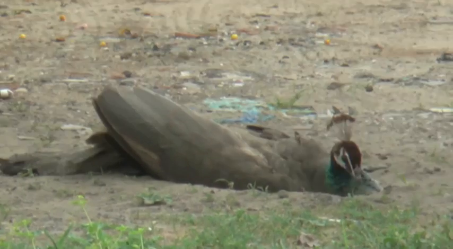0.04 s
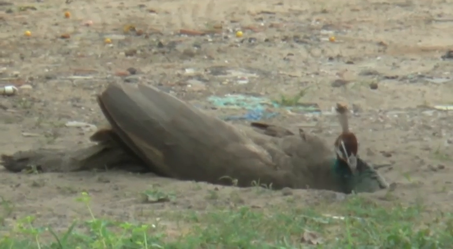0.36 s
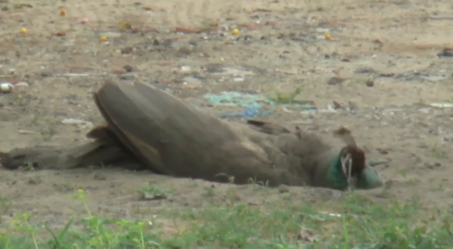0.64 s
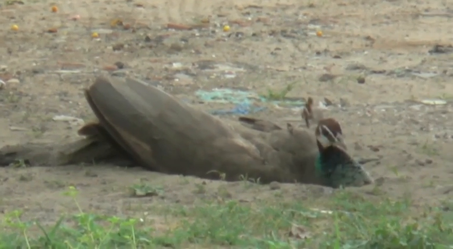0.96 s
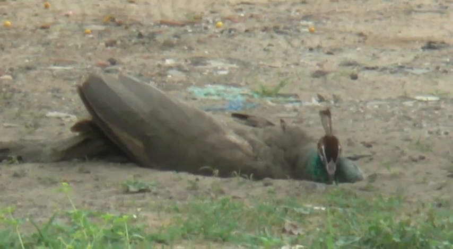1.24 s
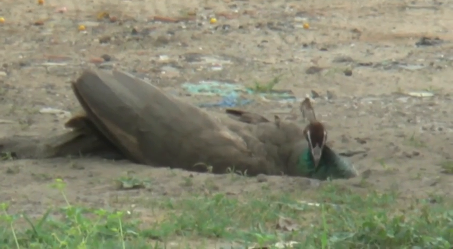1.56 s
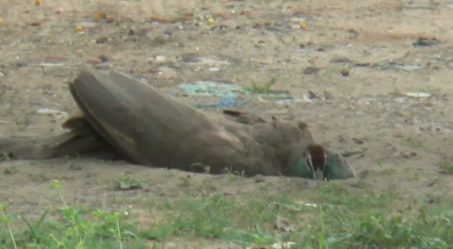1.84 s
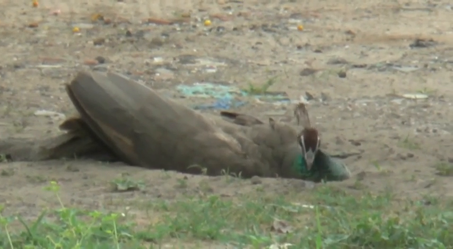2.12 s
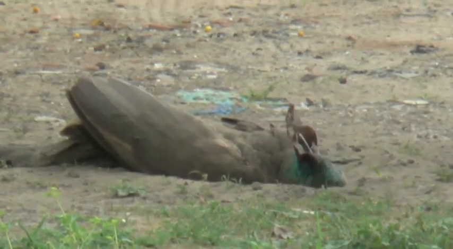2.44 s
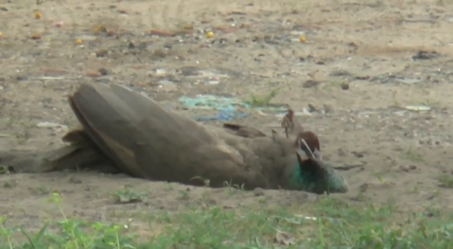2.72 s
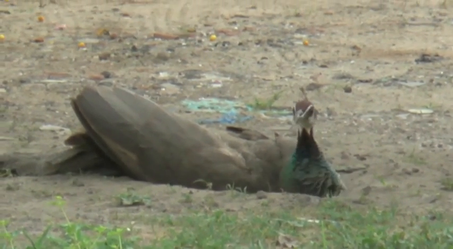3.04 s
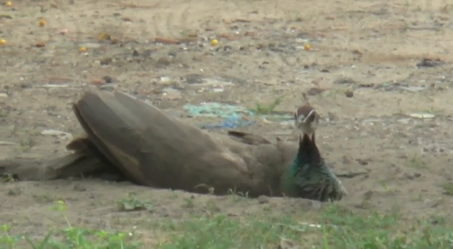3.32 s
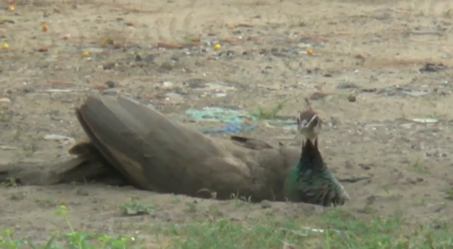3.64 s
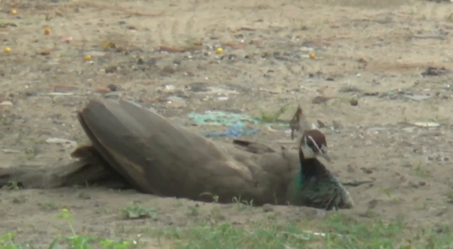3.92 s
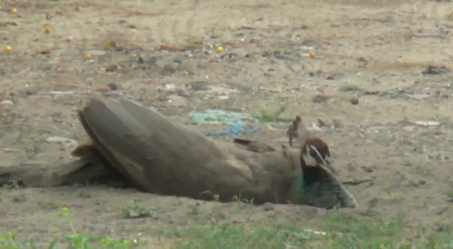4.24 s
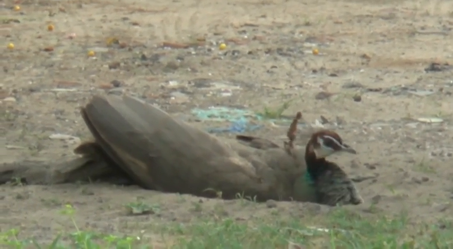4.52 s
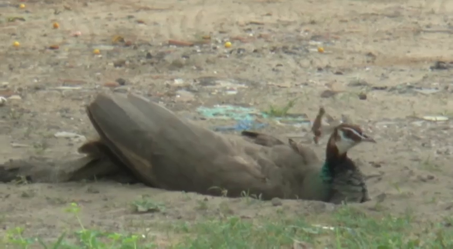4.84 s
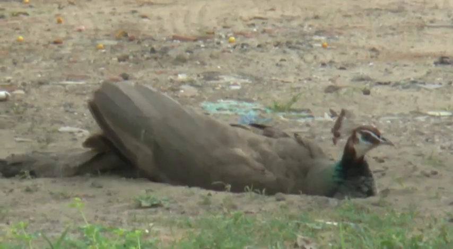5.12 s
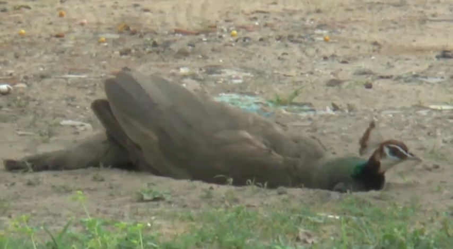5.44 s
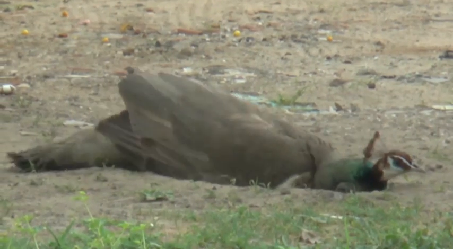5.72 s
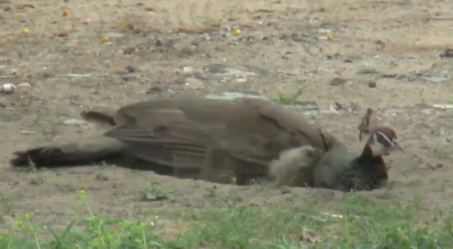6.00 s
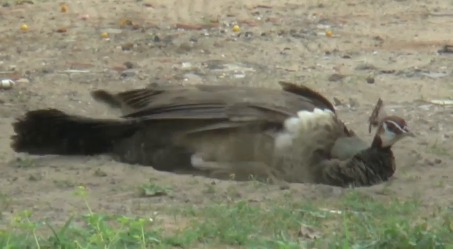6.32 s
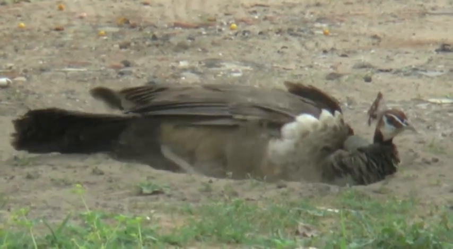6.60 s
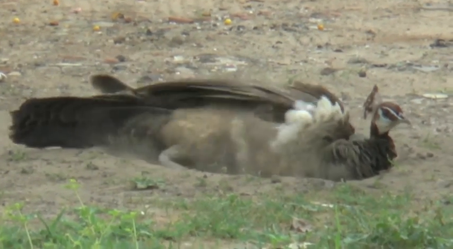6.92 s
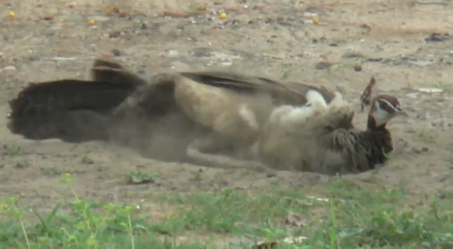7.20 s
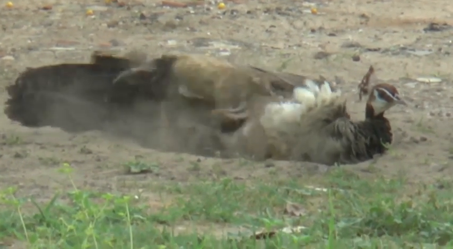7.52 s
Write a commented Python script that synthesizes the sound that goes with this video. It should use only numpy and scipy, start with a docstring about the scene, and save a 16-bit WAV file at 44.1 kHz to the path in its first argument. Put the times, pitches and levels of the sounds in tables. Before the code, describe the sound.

In an open yard, a nearby bird squeaks and rasps up to one clear arched whistle, crossed at first by harsh chatter. Insects buzz and trill in swells over a low rumble and leafy hiss, while distant birds twitter. Then a peahen dust-bathes close to the microphone with dry clicks, soft bumps and gritty swishes. The chatter returns in quick runs, and a faint hoot sounds near the end.

```python
"""A yard opens on a low rumble, a leafy hiss and a swell of buzzing insects. A near bird squeaks and
rasps up to one arched whistle, crossed at first by harsh chatter. An insect's trill swells and far birds
twitter and whistle. From about 3 s come dry clicks, soft bumps and the swishes of a peahen dust-bathing;
the chatter returns in quick runs, the insects swell again, and a far hoot sounds near the end.
A close wall colours most of the sounds, and the yard gives birds, knocks and swishes a short echo."""
import sys
import numpy as np
from scipy import signal
from scipy.fft import rfft, irfft, next_fast_len
from scipy.io import wavfile
from scipy.ndimage import uniform_filter1d, map_coordinates

SR = 44100
rng = np.random.default_rng(int(sys.argv[2]) if len(sys.argv) > 2 else 0)


def int16_out(signal):
    """Quantize to a 16-bit WAV file."""
    q = np.round(np.clip(np.atleast_2d(signal).T, -1, 1) * 32767)
    wavfile.write(sys.argv[1], SR, q.astype(np.int16))


N = 337806
TOP_HZ = 15800


def amp(db):
    """Decibels to gain."""
    return 10 ** (np.asarray(db) / 20)


def unit(x):
    """Scale to rms 1."""
    return x / np.sqrt(np.mean(x ** 2) + 1e-20)


def along(points, hz):
    """Read (f/Hz, value) points on a log frequency axis."""
    f, v = np.transpose(points)
    return np.interp(np.log(hz + 1), np.log(f), v)


def curves(rows, t):
    """Automation lanes: each column after the time, read at times t."""
    s, *cols = np.transpose(rows)
    return [np.interp(t, s, c) for c in cols]


def wobble(rate, size):
    """A smooth random modulator, rate knots a second."""
    knots = rng.standard_normal(16384)
    return map_coordinates(knots, [np.arange(size) * rate / SR], mode="wrap")


def filtered(x, response):
    """Apply a frequency response to x."""
    m = next_fast_len(N + 8192)
    return irfft(rfft(x, m) * response(np.fft.rfftfreq(m, 1 / SR)), m)[..., :N]


def coloured(x, eq):
    """x through an EQ curve, at rms 1."""
    return unit(filtered(x, lambda hz: amp(along(eq, hz))))


def add(track, s, sound):
    """Mix a sound into a track at time s."""
    part = track[max(0, round(s * SR)):][:len(sound)]
    part += sound[:len(part)]


def fade(t, edge):
    """Smooth fade in and out, edge seconds each."""
    return np.sin(np.pi / 2 * np.clip(np.minimum(t - t[0], t[-1] - t) / edge, 0, 1)) ** 2


def swell(start, hold, rise, t60):
    """An envelope that climbs 60 dB in rise seconds up to start, holds, then dies away."""
    t = np.arange(N) / SR
    return amp(-60 * (np.maximum(start - t, 0) / rise + np.maximum(t - start - hold, 0) / t60))


# Stereo image of the noise beds: f/Hz, left-right correlation
CORRELATION = [(30, 0.22), (80, 0.98), (160, 0.93), (3000, 0.99), (12000, 0.98)]
def rush(eq, patchy_db=0.9):
    """Stereo noise of rms 1 with drifting patches of gain."""
    def mid_side(hz):
        width = np.arccos(np.clip(along(CORRELATION, hz), -1, 1)) / 2
        return amp(along(eq, hz)) * np.array([np.cos(width), np.sin(width)])
    spectra = signal.stft(rng.standard_normal((2, N)), nperseg=512)[2]
    patches = uniform_filter1d(rng.standard_normal(spectra.shape[1:]), size=5, axis=0)
    patches = uniform_filter1d(patches, size=14, axis=1)
    pair = signal.istft(spectra * amp(patchy_db * unit(patches)), nperseg=512)[1][:, :N]
    mid, side = filtered(pair, mid_side)
    return unit(np.array([mid + side, mid - side]))


# Rumble EQ: f/Hz, level/dB
RUMBLE_EQ = [(15, -52), (25, -17), (195, 2), (328, -4.5), (482, -20), (573, -13), (870, -16.5),
             (1090, -23.5), (1250, -19.5), (1420, -17), (1600, -32), (2080, -25), (3520, -120)]
# Rumble fader, before trim: t/s, level/dB
RUMBLE_FADER = [(0.0, -56.5), (1.28, -57), (7.66, -60)]
def rumble(trim_db=2):
    """A bed of distant rumble that slowly eases off."""
    db = curves(RUMBLE_FADER, np.arange(N) / SR)[0]
    return amp(db + trim_db) * rush(RUMBLE_EQ, patchy_db=1.66)


# Leaf hiss EQ: f/Hz, level/dB
FOLIAGE_EQ = [(760, -42), (1300, -76), (1590, -4.5), (2100, -1.5), (3440, 1.5), (3740, 2), (4020, -2.5),
              (5440, -8), (7760, -25), (9180, -17.5), (15800, -27)]
# Leaf hiss fader, before trim: t/s, level/dB
FOLIAGE_FADER = [(0.0, -60.5), (0.72, -68), (1.36, -61.5), (2.22, -63), (4.18, -62), (4.44, -63),
                 (5.52, -66.5), (6.01, -66.5), (6.55, -65), (6.76, -60), (7.04, -66), (7.66, -66)]
def foliage(trim_db=8):
    """The hiss of leaves, rising and falling."""
    db = curves(FOLIAGE_FADER, np.arange(N) / SR)[0]
    return amp(db + trim_db) * rush(FOLIAGE_EQ)


# EQ of the buzz's body: f/Hz, level/dB
BODY_EQ = [(2600, -83), (3100, 2.5), (3700, 4), (4200, 4), (4600, -5.5), (7000, -66)]
# EQ of its sizzle: f/Hz, level/dB
SIZZLE_EQ = [(6500, 2), (8500, -4), (9200, 13.5), (10500, -5.5), (13800, -7), (14800, 6), (15700, -11.5)]
# Insect swells: t/s, hold/s, level/dB
BUZZ_CUES = [(0.233, 0.45, -52.5), (4.863, 0.4, -52)]
def buzz(lead_s=0.1, sizzle_db=-9.5):
    """Insects buzz in swells; a high sizzle joins at the height of each and dies sooner."""
    body = sum(amp(db) * swell(s - lead_s, hold + lead_s, rise=1.0, t60=2.9)
               for s, hold, db in BUZZ_CUES)
    sizzle = sum(amp(db + sizzle_db) * swell(s, hold, rise=0.37, t60=0.92) for s, hold, db in BUZZ_CUES)
    return body * rush(BODY_EQ) + sizzle * rush(SIZZLE_EQ)


def slur(length, hz, glide, arch):
    """Times and pitches of a note gliding through hz; a positive arch bows it upward."""
    t = np.arange(0, length, 1 / SR)
    progress = t / length - .5
    return t, hz * (1 + glide * progress - arch * progress ** 2)


# EQ on a whistle's overtones, relative to the fundamental: f/Hz, level/dB
OVERTONE_EQ = [(4000, -44), (4700, -31), (5800, -44), (7200, -40), (8300, -32), (9400, -22), (10200, -42),
               (11700, -36), (13500, -51)]
def whistle(hz, rough, rasp_hz=260, swing_hz=270, scatter_hz=130, flutter_db=4.5):
    """A syrinx tone; a second, uneven oscillation shakes its pitch and strength into a rasp."""
    n = len(hz)
    rasp = np.sin(2 * np.pi * np.cumsum(rasp_hz * (1 + 0.276 * wobble(150.3, n))) / SR)
    pitch = hz + rough * (swing_hz * rasp + scatter_hz * wobble(412.8, n))
    phase = 2 * np.pi * np.cumsum(pitch) / SR
    overtones = sum(amp(along(OVERTONE_EQ, k * hz)) * np.sin(k * phase) * (k * hz < TOP_HZ)
                    for k in range(2, 6))
    flutter = amp(rough * flutter_db * (rasp + wobble(311, n)))
    return unit((np.sin(phase) + overtones) * flutter)


# Squeaks and rasps: t/s, length/s, f/Hz, glide/share, arch/share, level/dB, roughness
SQUEAKS = [(0.129, 0.029, 3274, 0.0074, 0.28, -27.5, 0.31), (0.517, 0.038, 2510, -0.032, 0.31, -29.5, 0.88),
           (0.94, 0.11, 2670, 0.114, 0.17, -37.5, 0.6), (1.1, 0.098, 2485, 0.043, -0.052, -25, 0.59),
           (1.264, 0.074, 2280, 0.087, 0.78, -42.5, 0.65), (1.31, 0.098, 1793, 0.008, -0.048, -46, 0.5),
           (1.565, .127, 1915, -0.12, 0.29, -29.5, 0.44), (1.683, .14, 1422, -0.091, -0.23, -47, 0.17)]
# Contour of the clear whistle: t/s, f/Hz, level/dB
CALL_CONTOUR = [(1.364, 1800, -37), (1.372, 1814, -34.5), (1.378, 2044, -28), (1.416, 2250, -25),
                (1.454, 2360, -25), (1.506, 2343, -26), (1.515, 2351, -42)]
def song(edge_s=0.0074):
    """The near bird squeaks and rasps, leading up to one clear arched whistle and a rasping fall."""
    out = np.zeros(N)
    for s, length, hz, glide, arch, db, rough in SQUEAKS:
        t, pitch = slur(length, hz, glide, arch)
        effort_db = np.interp(t / length, [0, 0.3, 1], [-3.5, 0, -7])  # swells early, then sags
        add(out, s, amp(db + effort_db) * fade(t, edge_s) * whistle(pitch, rough))
    t = np.arange(CALL_CONTOUR[0][0] - edge_s / 2, CALL_CONTOUR[-1][0] + edge_s / 2, 1 / SR)
    pitch, db = curves(CALL_CONTOUR, t)
    add(out, t[0], amp(db) * fade(t, edge_s) * whistle(pitch, rough=0.091))
    return out


# Chatter runs: first t/s, last t/s, note count, ratio of each gap to the one before, level/dB
CHATTER_RUNS = [(0.132, 0.206, 2, 1.0, -40), (.359, 0.525, 2, 1.0, -38), (3.671, 3.867, 4, 1.15, -41),
                (4.467, 4.868, 7, 1.056, -42), (4.98, 5.188, 4, 1.105, -44.3), (5.297, 5.445, 3, 0.92, -44),
                (6.625, 6.915, 5, 1.18, -40)]
def chatter_notes(hz=935.2, detune=0.022, scatter_db=1, drop_db=0.04):
    """Cue list for the chatter (centre t/s, level/dB, f/Hz); most longer runs slow as they go."""
    notes = []
    for first, last, count, gap_ratio, db in CHATTER_RUNS:
        elapsed = np.append(0, np.cumsum(gap_ratio ** np.arange(round(count) - 1)))
        for k, s in enumerate(first + (last - first) * elapsed / elapsed[-1]):
            loud, sharp = rng.standard_normal(2)
            notes.append((s, db - drop_db * k + scatter_db * loud, hz * (1 + detune * sharp)))
    return notes


# Tone colour of the chatter, strong peaks from about 2 to 3.5 kHz and a faint high one: f/Hz, level/dB
CHATTER_EQ = [(950, -66), (1300, -28), (1870, 4), (2250, -7.5), (2650, 5.5), (2980, 7.5), (3450, 11),
              (4650, -8.5), (6300, -28.5), (9800, -18.5), (13500, -39), (15500, -42)]
# The bird's treble opens up as it turns from facing away: t/s, level/dB
HEAD_TURN = [(.6, -19), (4.2, 7)]
def chatter(length=0.04, edge_s=0.012, glide=0.103, arch=0.227, jitter=0.013, breathy=0.5, opening=0.41):
    """Each note is a short, harsh stack of harmonics that arches upward and brightens as the bill opens."""
    out = np.zeros(N)
    t, bend = slur(length, 1, glide, arch)
    progress = t / length - .5
    k = np.arange(1, 15)[:, None]
    breath = coloured(rng.standard_normal(N), CHATTER_EQ)
    for i, (s, db, hz) in enumerate(chatter_notes()):
        pitch = hz * (bend + jitter * wobble(865, len(t)))
        phase = 2 * np.pi * np.cumsum(pitch) / SR
        treble_db = curves(HEAD_TURN, s)[0] * (k > 4)  # the head shades the upper harmonics at first
        strength = amp(along(CHATTER_EQ, k * pitch) + treble_db + rng.normal(0, 2.8, k.shape))
        strength *= (k / 3) ** (opening * progress)
        stack = np.sum(strength * np.sin(k * phase + rng.uniform(0, 2 * np.pi, k.shape)), axis=0)
        turbulence = breath[i * len(t):][:len(t)] * (1 + np.cos(phase))  # gated once a cycle
        voice = (unit(stack) + breathy * turbulence) * amp(1.86 * wobble(346, len(t)))
        add(out, s - length / 2, amp(db) * fade(t, edge_s) * unit(voice))
    return out


def trill(start=1.7, hz=3690, sink_hz_per_s=45, db=-52, waver_hz=60, throb_db=3):
    """One insect's narrow trill swells, sinks slowly in pitch and fades."""
    pitch = hz - sink_hz_per_s * (np.arange(N) / SR - start) + waver_hz * wobble(160, N)
    tone = np.sin(2 * np.pi * np.cumsum(pitch) / SR)
    throb = amp(throb_db * wobble(70, N))
    return amp(db) * swell(start, hold=0.5, rise=4.8, t60=5.3) * unit(tone * throb)


def chirp(length, hz, glide, rough):
    """One slur from a far bird, with a soft attack and release."""
    t, pitch = slur(length, hz, glide, arch=0.1165)
    return fade(t, length / np.e) * whistle(pitch, rough)


def twitter(first_s=0.9, per_s=5, centre_hz=4950, db=-68.5, length=0.099):
    """Faint high slurs at random from the most distant small birds."""
    out = np.zeros(N)
    for i, (late, sharp, glide, scatter_db) in enumerate(rng.standard_normal((60, 4))):
        s = first_s + (i + late / 2) / per_s
        hz = centre_hz * np.exp(0.09 * sharp)
        add(out, s, amp(db + scatter_db) * chirp(length, hz, 0.15 * glide, rough=0.42))
    return out


# Far birds' slurs: t/s, length/s, f/Hz, glide/share, level/dB, roughness
WHISTLE_CUES = [(2.013, 0.13, 4400, 0.5, -50.5, 0.53), (2.119, 0.14, 5340, -.03, -61, 0.42),
                (2.38, 0.19, 5450, 0.094, -60.5, 0.1), (2.485, 0.066, 2600, 0.071, -38, 0.93),
                (2.507, 0.093, 4950, 0.13, -56, 0.14), (2.703, 0.13, 6250, -0.38, -61.5, 0.65),
                (2.727, 0.066, 2130, 0.14, -43.5, 0.65), (2.859, 0.057, 2130, -0.045, -46.5, .4),
                (3.122, 0.17, 3050, 0.02, -54.5, 0.42), (3.565, 0.081, 2630, -0.046, -48.5, 0.73),
                (3.88, 0.032, 2020, -0.44, -46.5, 0.54), (3.916, 0.34, 3130, -.02, -54, 0.41),
                (4.294, 0.2, 5200, -0.026, -62, .15), (5.325, 0.047, 2820, -.25, -42, 0.42),
                (5.55, 0.045, 1930, .27, -46.5, 0.47), (5.663, 0.11, 2230, 0, -49, 0.77),
                (5.93, 0.19, 2150, -0.12, -55, 0.88), (6.143, 0.047, 4780, 0.13, -54.5, .1),
                (6.498, 0.063, 4550, -0.48, -55, 1.34), (7.115, 0.066, 2600, 0.14, -48.5, 0.45),
                (7.172, .13, 3880, 0.46, -54.5, 0.4), (7.26, 0.17, 5100, .05, -57.5, 1.05)]
def far_whistles():
    """Single whistles from birds around the yard."""
    out = np.zeros(N)
    for s, length, hz, glide, db, rough in WHISTLE_CUES:
        add(out, s, amp(db) * chirp(length, hz, glide, rough))
    return out


# Click EQ: f/Hz, level/dB
CLICK_EQ = [(410, -63), (700, -7), (1210, -16), (2130, 6), (2460, -2.5), (3320, 0.5), (4770, 0),
            (7700, -18), (9600, -11), (15500, -26)]
# Click hits, before trim: t/s, level/dB
CLICK_CUES = [(2.904, -24.5), (2.9719, -27.5), (2.9821, -33.5), (3.5219, -36), (4.13, -30), (4.2965, -35.5),
              (5.5316, -32.5), (5.6367, -34), (5.868, -37), (7.432, -33), (7.476, -39.5)]
def clicks(crack_t60=0.02, cluster_t60=0.13, crack_db=1, spiky_db=4, trim_db=-13):
    """Dry snaps: a sharp crack, then a dying cluster of tiny ones."""
    force = np.zeros(N)
    t = np.arange(SR // 5) / SR
    decay = amp(crack_db - 60 * t / crack_t60) + amp(-60 * t / cluster_t60)
    for s, db in CLICK_CUES:
        spikes = unit(amp(spiky_db * wobble(780, len(t))))
        add(force, s, amp(db + trim_db) * decay * spikes)
    return force * coloured(rng.standard_normal(N), CLICK_EQ)


# Modes of the hollow body: f/Hz, level/dB, t60/s
HOLLOW_MODES = [(169, -35, 0.017), (250, 4, 0.031), (316, -10, 0.024), (640, -14, 0.028)]
# Soft knocks: t/s, level/dB
BUMP_CUES = [(2.999, -27), (3.25, -20), (3.297, -32)]
def bumps(attack_s=0.0052, shudder_db=-16.5, shudder_t60=0.32):
    """Dull knocks on something hollow, which shudders on for a moment."""
    knocks, shudder = np.zeros(N), np.zeros(N)
    t = np.arange(SR // 2) / SR
    ring = sum(amp(db - 60 * t / t60) * np.sin(2 * np.pi * hz * t) for hz, db, t60 in HOLLOW_MODES)
    for s, db in BUMP_CUES:
        add(knocks, s, amp(db) * ring * (1 - np.exp(-t / attack_s)))
        add(shudder, s, amp(db + shudder_db - 60 * t / shudder_t60))
    shudder_eq = [(90, -38), (190, 2), (330, -3), (480, -15), (750, -15), (1300, -61)]  # f/Hz, level/dB
    return knocks + shudder * rush(shudder_eq, patchy_db=-5)[0]


# Grit EQ: f/Hz, level/dB
GRIT_EQ = [(900, -11.5), (1500, -10.5), (2200, 5), (3400, 2.5), (5300, -1.5), (7000, -18.5), (9500, -16),
           (15000, -27)]
# Feathers and dust sweeping the ground: t/s, hold/s, level/dB
WING_STROKES = [(3.227, 0.059, -52), (3.522, 0.064, -48.5), (5.54, .17, -51.5), (5.808, 0.095, -54),
                (7.274, 0.069, -53.5), (7.433, 0.055, -50)]
def dust_bath(grit_db=4):
    """Gritty swishes as the hen works her wings into the dust."""
    strokes = sum(amp(db) * swell(s, hold, rise=0.17, t60=0.23) for s, hold, db in WING_STROKES)
    grains = rng.standard_normal(N) * amp(grit_db * wobble(300, N))
    return strokes * coloured(grains, GRIT_EQ)


def hoot(start=7.08, length=0.34, hz=545, sag_hz_per_s=55, db=-58, octave_db=-8, waver=0.0299):
    """A far, soft, wavering hoot that sinks and fades."""
    since = np.clip(np.arange(N) / SR - start, 0, length)
    pitch = (hz - sag_hz_per_s * since) * (1 + waver * wobble(54.6, N))
    phase = 2 * np.pi * np.cumsum(pitch) / SR
    envelope = swell(start, hold=0.021, rise=0.6, t60=1.4) * swell(start, length, rise=0.6, t60=0.6)
    return amp(db) * envelope * unit(np.sin(phase) + amp(octave_db) * np.sin(2 * phase))


def wall(x, spacing_hz=383, notch_hz=490):
    """A close reflection cuts evenly spaced notches, deepest in the mids."""
    bounce = [(250, 0.032), (480, 0.25), (1300, 1), (2200, 0.46), (5000, 0.77), (12000, 0.28)]
    def comb(hz):
        gain = np.clip(along(bounce, hz), 0, .9)
        reflection = gain * np.exp(-2j * np.pi * (hz - notch_hz) / spacing_hz)
        return (1 - reflection) / np.sqrt(1 + gain ** 2)
    return filtered(x, comb)


# Decay of the yard's tail: f/Hz, t60/s
YARD_DECAY = [(200, 0.8), (2500, 0.43), (12000, 0.022)]
def yard(x, early_db, late_db, early_t60=0.36, width=0.6):
    """Direct sound, scatter from near surfaces and a thin tail."""
    hz, t, spectra = signal.stft(rng.standard_normal((3, SR // 2)), SR, nperseg=256)
    late = signal.istft(spectra * amp(-60 * t / along(YARD_DECAY, hz)[:, None]), SR, nperseg=256)[1]
    early = rng.standard_normal(late.shape) * amp(-60 * np.arange(late.shape[1]) / SR / early_t60)
    echo = amp(early_db) * early / np.linalg.norm(early[0])
    echo += amp(late_db) * late / np.linalg.norm(late[0])
    stereo_echo = echo[0] + width * echo[1:]  # left and right share most of the echo
    return x + signal.fftconvolve(x[None], stereo_echo, axes=1)[:, :N]


def scene():
    """The mix: birds slightly to the left, knocks and rustling close by, insects and air all round."""
    near = amp(-1) * yard(wall(song()), early_db=-14, late_db=-19)
    far = amp(-2) * yard(far_whistles() + twitter() + hoot(), early_db=-6, late_db=-8)
    scolding = yard(wall(chatter()), early_db=-14, late_db=-15)
    foley = yard(wall(clicks() + dust_bath()) + bumps(), early_db=-9.5, late_db=-18)
    ambience = wall(rumble() + foliage() + trill() + buzz())
    pan_left = amp([[.5], [-.5]])
    return (near + far + scolding) * pan_left + foley + ambience


def record(dry):
    """A brick-wall low-pass on the whole mix."""
    return filtered(dry, lambda hz: hz < TOP_HZ)


dry = scene()
out = record(dry)
int16_out(out)
```